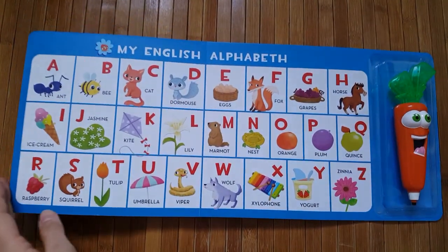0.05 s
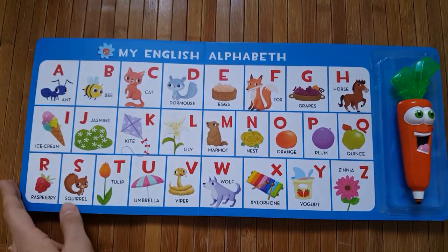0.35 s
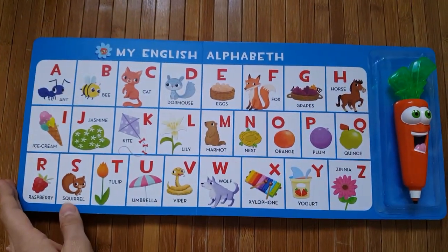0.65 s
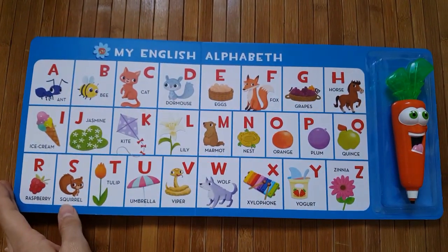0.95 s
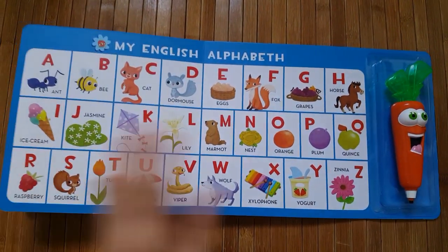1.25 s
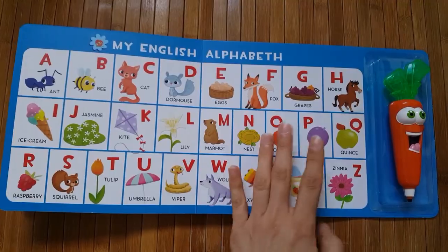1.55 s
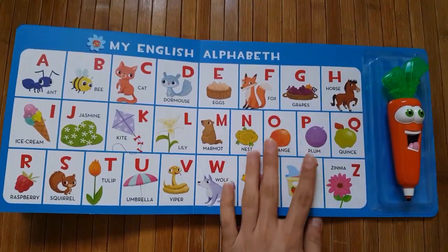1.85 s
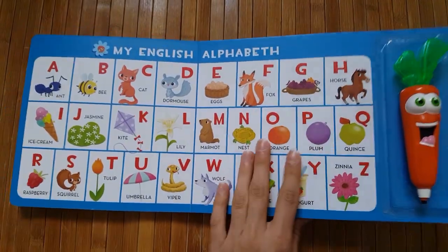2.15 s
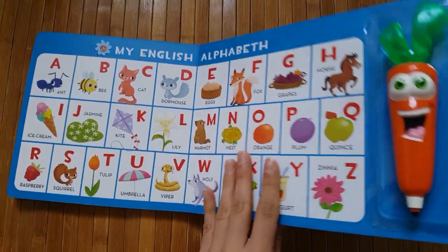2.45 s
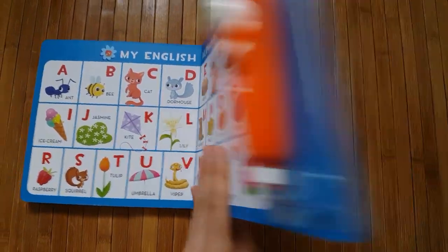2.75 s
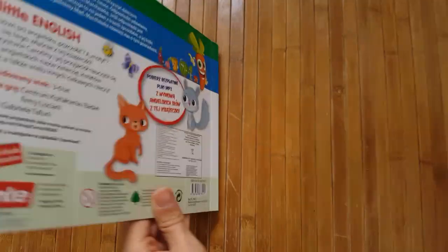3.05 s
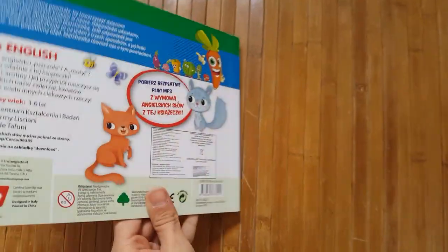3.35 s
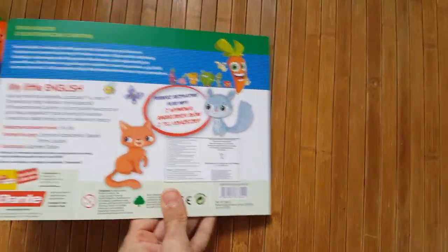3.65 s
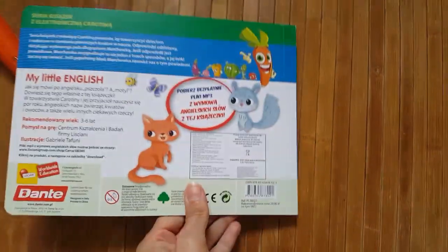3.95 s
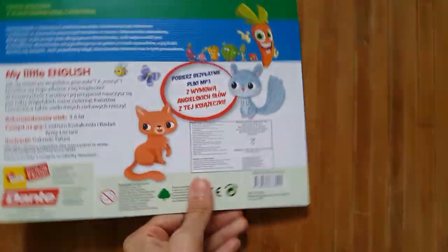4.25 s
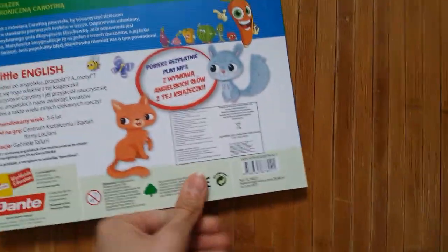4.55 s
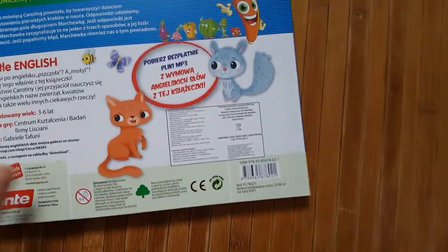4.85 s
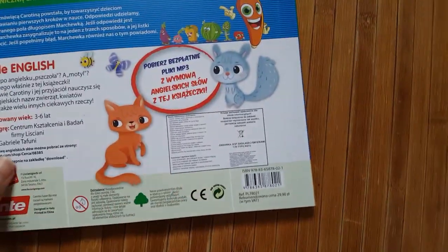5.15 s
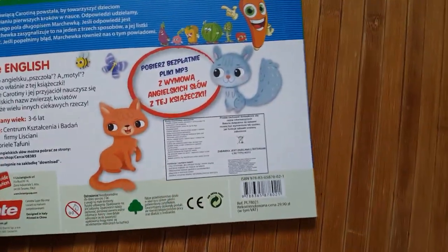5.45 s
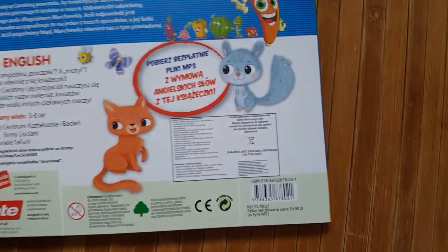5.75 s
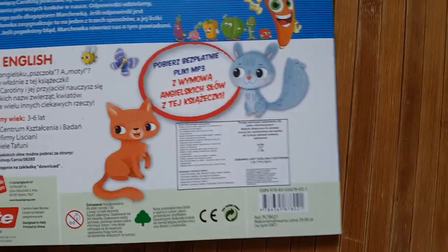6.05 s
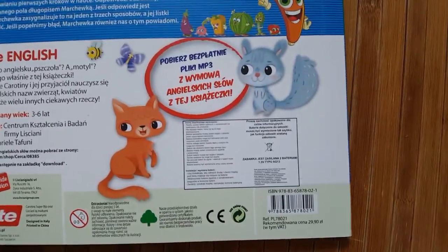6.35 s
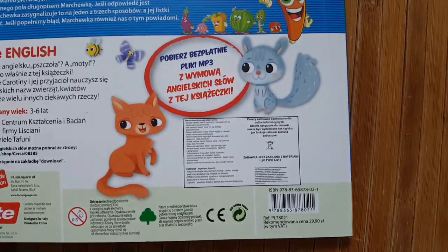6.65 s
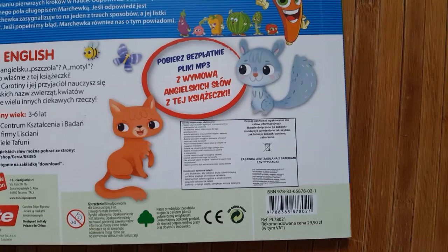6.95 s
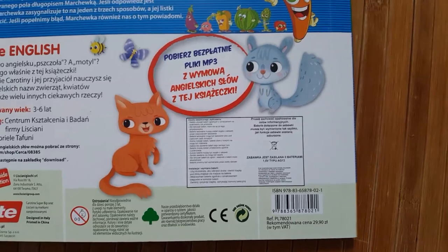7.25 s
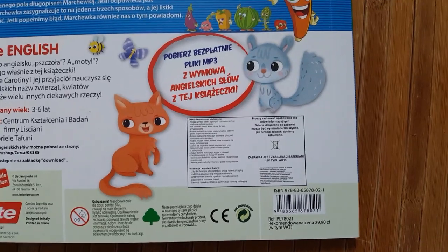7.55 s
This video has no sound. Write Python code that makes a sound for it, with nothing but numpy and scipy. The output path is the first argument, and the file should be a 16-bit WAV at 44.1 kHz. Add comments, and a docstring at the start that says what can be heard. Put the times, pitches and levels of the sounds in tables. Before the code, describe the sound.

A hand handles a cardboard book on wood: a tap, a slap with a plastic rattle, then rubbing, sliding and small knocks.

```python
"""Handling a cardboard book

A stiff book with a plastic toy pen in a blister is handled on a wooden table in a small room where a
far motor hums. A hand taps it, swings one half over to land with a puff of air and a clatter, then
lifts, sets down and shoves it. Impacts excite the damped modes of the boards; between them, boards
and fingers rub with a rasp and a hiss. At the end a finger brushes the right microphone port."""
import sys
import numpy as np
from scipy import signal
from scipy.fft import rfft, irfft, next_fast_len
from scipy.io import wavfile
from scipy.ndimage import map_coordinates

SR = 44100
rng = np.random.default_rng(int(sys.argv[2]) if len(sys.argv) > 2 else 0)


def master(y):
    """Save y as 16-bit WAV."""
    cut = np.clip(np.atleast_2d(y).T, -1, 1)
    pcm = np.round(cut * 32767)  # scale
    wavfile.write(sys.argv[1], SR, pcm.astype(np.int16))


N = 339735
TIME = np.arange(N) / SR
SWUNG_S, FOLDED_S = 2.9, 3.7  # the book's three poses: lying open, swung over, lying folded

# Spectrum of the room air: f/Hz, relative level/dB
AIR_SPECTRUM = [(15, -40), (25, -3), (86, -4), (213, -10), (250, -9), (354, -15.5), (394, -14),
                (529, -11.5), (673, -17.5), (833, -11), (1090, -11), (1910, -20), (6900, -33.5),
                (13800, -34), (15000, -37)]
# Partials of the motor: f/Hz, early level/dB, late level/dB
MOTOR_PARTIALS = [(78, -73, -70), (169.5, -84, -68.5), (251, -91, -76)]
# Pops of the finger on the right port: t/s, relative level/dB, release time/ms
PORT_POPS = [(7.3327, -0.5, 0.15), (7.3352, -30, .25), (7.3353, -1.5, 0.22), (7.3360, -16, 0.26),
             (7.3388, -14, 0.12), (7.3657, -30.5, 1.2), (7.3782, -33.5, 1.8), (7.4612, -32, 0.31),
             (7.4695, -29, 0.37), (7.484, -41, 1)]
# Level difference between the ports: f/Hz, left minus right/dB
PORT_LEVEL_DIFFERENCE = [(100, -2), (450, -1.5), (900, 0), (1300, 2.5), (1800, 6.5), (2800, 5.5),
                         (4500, 2.5), (7500, 0), (10000, -0.5), (14000, 3)]
# Time difference set by the book's bearing: t/s, delay of the left port/ms
PORT_DELAY = [(1.2, -0.11), (2.9, -0.083), (3.1, 0.14), (3.4, 0.059), (3.9, -0.023), (4.3, -0.042),
              (4.63, 0.026), (5.0, 0.26), (6.7, 0.22)]
# Spectrum of the sliding contact, shared by the puff of air: f/Hz, relative level/dB
STROKE_SPECTRUM = [(60, -15.5), (170, -10), (270, -14), (450, -16.5), (650, -11.5), (870, -1.5),
                   (1050, -6.5), (1300, -15), (2300, -6.5), (3000, -13), (4200, -19), (5300, -20.5),
                   (9000, -24), (14500, -29.5)]
# Strokes of a hand or board, and the puff of air just before the swung half lands (at 3.08 s):
# start/s, length/s, midway level/dB, swell/dB, hiss re body/dB
STROKES_AND_PUFF = [(1.743, .23, -73, 7, 5), (1.99, 0.15, -71, 5, -3), (2.21, 0.44, -69.5, -9.5, -6.5),
                    (2.676, 0.26, -65, 9, -3.5), (2.917, 0.15, -62, 4, -2.5),
                    (2.923, .018, -54, 8.5, -10.5), (3.08, 0.032, -56, 18, -8),
                    (3.152, 0.39, -52.5, -20.5, -1), (3.562, 0.24, -58, 8, -1),
                    (3.797, 0.21, -51.5, -4.5, -4.5), (4.0, 0.21, -54, 2.5, -7), (4.176, .19, -50.5, 3, -6),
                    (4.359, 0.13, -53, -0.5, -7.5), (4.518, 0.101, -66, 13, -8.5),
                    (4.635, 0.087, -51.5, -1.5, -6.5), (4.743, 0.028, -50.5, 3.5, -11.5),
                    (4.78, .24, -74.5, -2, 7), (5.027, 0.051, -41, 1.5, -15), (5.08, 0.11, -57.5, 0, -9),
                    (5.199, 0.135, -50.5, -3, -10.5), (5.314, .039, -42.5, 3, -6),
                    (5.357, 0.02, -33, -3.5, -12), (5.382, 0.084, -52.5, -4, -10),
                    (5.503, 0.23, -54.5, 16.5, -10.5), (5.925, 0.3, -49.5, -5, -10),
                    (6.164, 0.079, -45.5, -4.5, -13), (6.272, 0.26, -64.5, 4.5, -12.5),
                    (6.653, 0.035, -55.5, 4.5, -11)]
# Modes of the book on the table: f/Hz, width before hand damping/Hz, level/dB in each of the three poses
BOARD_MODES = [(110, 17, -25, -6.5, -22), (162.7, 17, -28, -12.5, -8.5), (314.3, 32, 7.5, -1.5, -11),
               (454, 81, -6, -6.5, -11), (540, 71, -1.5, -3, -7.5), (682, 70, -14.5, -8.5, -5.5),
               (810, 100, 0, -2.5, 0.5), (879, 150, 0, -3.5, 6.5), (1027, 150, 0.5, 3.5, -3.5),
               (1270, 180, -22, -3.5, -18), (1660, 330, -10, 3.5, -1.5), (2230, 870, -8.5, 2, -3),
               (2950, 420, -10, 5, -2.5), (4080, 780, -13, -8, -8)]
# Damping by the holding hand: factor on the mode widths in each of the three poses
POSE_DAMPING = [1.4, 2.2, 1.23]
# Thump, body, clack and tick registers: lowest f/Hz, highest f/Hz
IMPACT_REGISTERS = [(70, 480), (580, 1300), (1500, 4200), (4900, 15000)]
# Knocks of fingers and boards: t/s, body level/dB, clack re body/dB, thump re body/dB, contact time/ms
HANDLING_KNOCKS = [(1.183, -28, -11.5, -8, 8.7), (1.194, -41.5, -3, -4, 2.3), (1.664, -51, -15, -11, 5.4),
                   (1.753, -52.5, -10, -6, 2.2), (2.702, -67.5, 10.5, 0, 2.9), (2.838, -55.5, -3, -8, 2.9),
                   (2.939, -39, -3.5, -9, 4.2), (3.263, -36.5, 7, 6.5, 4.9), (3.833, -41, -20, -6.5, 3.2),
                   (4.209, -45.5, -13, -14, 4), (4.629, -22, -13.5, -17, 3.7), (4.773, -41, -17, -26, 3.8),
                   (5.03, -33.5, 1, -0.5, 1.4), (5.1455, -36.5, 3.5, -5, 2), (5.275, -37.5, 4, -2, 2.1),
                   (5.2843, -44.5, 4, 0, 1.6), (5.343, -29.5, 0.5, -9.5, 2.8), (5.37, -31.5, 5, -20, 6.4),
                   (5.463, -44, -4, -8, 1.5), (5.948, -47, -4, 1.5, 1.6), (6.179, -39, 3, -9, 7),
                   (6.649, -50.5, 4, -6, 1.3)]
# Rebounds of pen and blister after the landing: t/s, body level/dB, clack re body/dB
PEN_REBOUNDS = [(3.115, -23, 5.5), (3.123, -27.5, 1), (3.129, -28.5, 3.5), (3.1547, -30.5, 6.5),
                (3.191, -36, 4), (3.21, -39.5, 4.5), (3.231, -41.5, 7.5), (3.2424, -32.5, 10),
                (3.2595, -31.5, 11), (3.338, -47, 2), (3.4113, -31.5, 4.5)]
# Soft tocks as the shoved book sticks and lets go: t/s, body level/dB
SHOVE_SLIPS = [(5.9662, -39), (5.988, -41), (6.022, -42), (6.053, -49), (6.192, -43.5), (6.22, -43),
               (6.249, -47), (6.32, -49), (6.336, -53), (6.395, -48), (6.4202, -47.5), (6.4484, -47.5),
               (6.48, -53), (6.514, -53), (6.566, -56.5), (6.614, -52)]


def undb(db):
    """Amplitude ratio of a level in decibels."""
    return 10 ** (np.asarray(db) / 20)


def unit(x):
    """Normalisation to unit RMS."""
    return x / np.sqrt(np.mean(x ** 2))


def band(x, lo_hz, hi_hz, order=3):
    """Butterworth band-pass filtering."""
    sos = signal.butter(order, [lo_hz, min(hi_hz, SR * .45)], "band", fs=SR, output="sos")
    return signal.sosfilt(sos, x)


def colour(x, points):
    """Minimum-phase filtering through (f/Hz, gain/dB) points: causality keeps attacks sharp."""
    hz, db = np.transpose(points)
    half = next_fast_len(x.shape[-1] // 2 + 2048)
    f = np.maximum(np.arange(half + 1) * SR / (2 * half), 1)
    cepstrum = irfft(np.log(undb(np.interp(np.log(f), np.log(hz), db))))
    response = np.exp(rfft(np.r_[cepstrum[0], 2 * cepstrum[1:half]], 2 * half))
    return irfft(rfft(x, 2 * half) * response)[..., :x.shape[-1]]


def add(out, x, start_s):
    """Linear superposition of x from start_s on."""
    i = int(start_s * SR)
    out[..., i:i + x.shape[-1]] += x[..., :N - i]


def drift(rate_hz):
    """Random fluctuation by interpolation between Gaussian values of unit spread."""
    knots = np.arange(0, N / SR + 1, 1 / rate_hz)
    return np.interp(TIME, knots, rng.standard_normal(N)[:len(knots)])


def envelope(age, attack_s, length_s, release_s):
    """Linear rise, a hold until length_s, then exponential decay."""
    return np.clip(age / attack_s, 0, 1) * np.exp(-np.maximum(age - length_s, 0) / release_s)


def stereo(three, split_hz):
    """Coherence falls with frequency: two ports share one signal's bass, and each has its own treble."""
    low, high = (signal.butter(1, split_hz, kind, fs=SR) for kind in ("low", "high"))
    return signal.lfilter(*low, three[0]) + signal.lfilter(*high, three[1:])


def stereo_noise(length, split_hz):
    """Gaussian noise, coherent between the ports below split_hz."""
    return stereo(rng.standard_normal((3, length)), split_hz)


def grains(per_s, spread_db):
    """Shot noise: tiny pulses of uneven size occur independently."""
    size = undb(spread_db * np.minimum(rng.exponential(size=(3, N)), 5))
    occurs = rng.random((3, N)) < per_s / SR
    return unit(stereo(occurs * size * rng.standard_normal((3, N)), split_hz=850))


def room_air(level_db=-63):
    """Ambient noise: a broad, nearly stationary spectrum, strongest in the bass."""
    air = unit(colour(stereo_noise(N, split_hz=310), AIR_SPECTRUM))
    return air * undb(level_db + 0.27 * drift(2.5))


def motor_hum():
    """A far motor's partials swell, with slight random amplitude and phase modulation."""
    swell = np.interp(TIME, [4.4, 6.4], [0, 1])
    hum = np.zeros(N)
    for hz, early_db, late_db in MOTOR_PARTIALS:
        rms = undb(early_db + (late_db - early_db) * swell + 1.5 * drift(4.8))
        hum += np.sqrt(2) * rms * np.sin(2 * np.pi * hz * TIME + 0.25 * drift(4.2))
    return hum


def reverberation(x, early_s=0.013, early_db=-6.0, tail_db=-4.5, low_t60=0.5, high_t60=0.44):
    """Table and walls reflect early; a diffuse field then stores energy and loses it exponentially."""
    t = TIME[:8192]
    echo = stereo_noise(len(t), split_hz=2100) * np.exp(-t / early_s) * np.clip((t - .003) / .0025, 0, 1)
    echo /= np.sqrt(np.sum(echo ** 2) / 2)
    out = undb(early_db) * signal.fftconvolve(x, echo, axes=-1)[:, :N]
    diffuse = stereo_noise(N, split_hz=1000)
    edges = np.geomspace(60, 16000, 16)
    for lo, hi, t60 in zip(edges, edges[1:], np.linspace(low_t60, high_t60, len(edges) - 1)):
        retained = np.exp(-np.log(10 ** 6) / (t60 * SR))
        power = np.mean(band(x, lo, hi) ** 2, axis=0)
        stored = signal.lfilter([1 - retained], [1, -retained], power)
        out += undb(tail_db) * unit(band(diffuse, lo, hi)) * np.sqrt(np.roll(stored, int(0.0055 * SR)))
    return out


def port_touch(rise_s=.00008, press_db=-29, press_s=0.0063, brush_db=-39):
    """Compression and release: a finger traps air in the right port, lets it pop, then brushes the rim."""
    t, out = TIME[:2048], np.zeros(N)
    for s, db, release_ms in PORT_POPS:
        pop = 2 * (1 - np.exp(-t / rise_s)) ** 2 * np.exp(-t * 1000 / release_ms)
        add(out, -undb(db) * pop, s)
    out += undb(press_db) * np.exp(-((TIME - 7.334) / press_s) ** 2)
    brush = colour(rng.standard_normal(N),
                   [(50, -2), (300, -5), (1200, 2), (3000, -5), (7000, -13.5), (14000, -23)])
    contact = envelope(TIME - 7.363, attack_s=0.0069, length_s=0.033, release_s=0.0094)
    out += unit(brush) * undb(brush_db) * contact
    return band(out, 42, 18000, order=2) * np.array([[0], [1]])


def palm_skim(start_s=1.13, end_s=1.375, db=-70):
    """Light friction: the slapping hand skims off the glossy page with a faint hiss."""
    skim = np.sin(np.pi * np.clip((TIME - start_s) / (end_s - start_s), 0, 1) ** 0.9)
    return undb(db) * skim * unit(band(rng.standard_normal((2, N)), 3100, 12000, order=1))


def stroke_and_puff_gains(attack_share=0.17, release_s=0.018):
    """Incoherent sounds add in power; each one's body, rasp and hiss rise, swell or fade, and stop."""
    power, age = np.zeros((3, N)), TIME[:SR]
    for s, length_s, db, swell_db, hiss_db in STROKES_AND_PUFF:
        strength = undb(db + swell_db * (np.minimum(age / length_s, 1) - .5))
        shape = strength * envelope(age, attack_share * length_s, length_s, release_s)
        rasp_db = 0.5 + .38 * hiss_db
        add(power, np.outer(undb([0, rasp_db, hiss_db]), shape) ** 2, s)
    return np.sqrt(power)


def sliding_and_puff(catch_gain=0.29, flutter_db=(2.5, 1.34, .6)):
    """Friction of card on wood and skin: boards resonate, edges rasp, the gloss hisses.
    The same noise voices the puff of air displaced just before the swung half lands."""
    catches = unit(band(grains(per_s=120, spread_db=1.5), 100, 6000, order=1))  # an edge snags
    noise = colour(grains(per_s=6000, spread_db=0) + catch_gain * catches, STROKE_SPECTRUM)
    body = band(noise, 110, 1350)
    rasp = band(noise, 1400, 4300, order=5)
    hiss = band(noise, 4700, 15000, order=4)
    grip = drift(60)  # uneven grip makes the level flutter
    return sum(unit(x) * gain * undb(db * grip)
               for x, gain, db in zip((body, rasp, hiss), stroke_and_puff_gains(), flutter_db))


def rattle(start_s=3.116, chatter_t60=0.6, chatter_db=-34.5, shudder_t60=0.95, shudder_db=-43):
    """Free decay after the landing: the pen chatters in its blister and the table shudders."""
    age = np.maximum(TIME - start_s, 0)
    chatter = colour(grains(per_s=550, spread_db=5),
                     [(60, -7.5), (300, 0), (1100, -1.5), (3000, -5.5), (7000, -12), (14000, -24)])
    shudder = colour(stereo_noise(N, split_hz=500),
                     [(25, -15), (55, -3.5), (85, -6), (110, -1), (150, -13), (400, -38.5), (3000, -81)])
    chatter = undb(chatter_db - 60 * age / chatter_t60) * unit(chatter)
    shudder = undb(shudder_db - 60 * age / shudder_t60) * unit(shudder)
    return (age > 0) * (chatter + shudder)


def board_response(t, pose, spot_db=3.0, spot_detune=0.026):
    """Modal superposition: the impulse response is a sum of damped cosines that vary with the spot hit."""
    hz, width, *mode_db = np.transpose(BOARD_MODES)[:, :, None]
    width = width * POSE_DAMPING[pose]
    detune, spot = rng.standard_normal((2, len(hz), 1))
    amplitude = undb(mode_db[pose] + spot_db * spot) * width
    modes = amplitude * np.exp(-np.pi * width * t) * np.cos(2 * np.pi * hz * (1 + spot_detune * detune) * t)
    return 2 * np.pi / SR * (modes[::2].sum(0) - modes[1::2].sum(0))  # neighbours start in antiphase


def impact(levels_db, contact_ms, pose, crush=0.32, crack=0.13, span_s=0.0056):
    """Impulse excitation: a blow and the crushing of fibres after it drive the modes of the boards."""
    t = TIME[:4096]
    force = stereo_noise(len(t), split_hz=2200) * crush * np.exp(-t * 1000 / contact_ms)
    force[:, 0] += 2  # the blow itself
    ring = signal.fftconvolve(force, board_response(t, pose)[None], axes=-1)[:, :len(t)]
    sound = colour(ring + crack * force, [(25, -18.5), (90, 2), (300, 1.5), (5000, -2), (14000, -9)])
    equaliser = []
    for (lo, hi), db in zip(IMPACT_REGISTERS, levels_db):
        # a register's level is its energy spread over span_s
        power = np.sum(band(sound, lo, hi, order=5) ** 2) / (2 * span_s * SR)
        gain_db = db - 10 * np.log10(power)
        equaliser += [(lo, gain_db), (hi, gain_db)]
    return colour(sound, equaliser)


def book_impacts():
    """Direct plus reverberant sound of every impact; a harder contact raises clack and tick alike."""
    # t/s, body level/dB, (thump, clack, tick) re body/dB, contact time/ms, room send/dB
    knocks = [(s, db, (thump, clack, clack - 11.5), ms, -8.5)
              for s, db, clack, thump, ms in HANDLING_KNOCKS]
    landing = [(3.103, -16, (-4.5, 0, -2.5), 2.5, 0.5)]  # the swung half falls flat
    rebounds = [(s, db, (-3.5, clack, clack - 5.5), 2.8, -4.5) for s, db, clack in PEN_REBOUNDS]
    slips = [(s, db, (-16, -11, -27), 1.7, -8) for s, db in SHOVE_SLIPS]
    direct, sent = np.zeros((2, 2, N))
    for s, body_db, (thump, clack, tick), contact_ms, room_db in knocks + landing + rebounds + slips:
        pose = int(s > SWUNG_S) + int(s > FOLDED_S)
        sound = impact(body_db + np.array([thump, 0, clack, tick]), contact_ms, pose)
        add(direct, sound, s)
        add(sent, sound * undb(room_db), s)
    return direct + reverberation(sent + 1e-18 * rng.standard_normal(N))


def scene():
    """Level and time differences between the ports place the book; touch, air and hum are superposed."""
    book = book_impacts() + rattle() + sliding_and_puff() + palm_skim()
    left, right = (colour(x, [(hz, side * db / 2) for hz, db in PORT_LEVEL_DIFFERENCE])
                   for x, side in zip(book, (1, -1)))
    lag_ms = np.interp(TIME, *np.transpose(PORT_DELAY))
    left = map_coordinates(left, [(TIME - lag_ms / 1000) * SR], order=5)
    return np.array([left, right]) + port_touch() + room_air() + motor_hum()


def record(dry, ceiling=.9, cutoff_hz=14550):
    """Soft saturation rounds the highest peaks; a steep low-pass limits the bandwidth."""
    rounded = ceiling * np.tanh(dry / ceiling)
    return signal.sosfilt(signal.ellip(8, .2, 70, cutoff_hz, fs=SR, output="sos"), rounded)


dry = scene()
out = record(dry)
master(out)
```